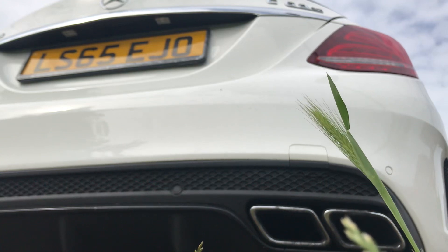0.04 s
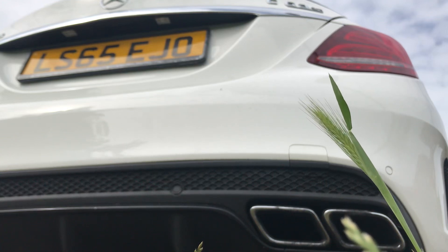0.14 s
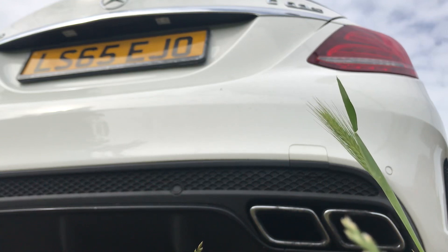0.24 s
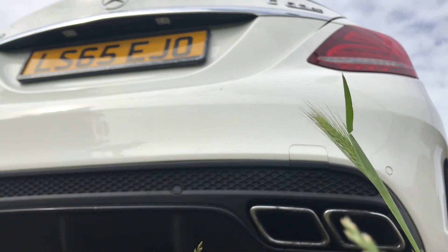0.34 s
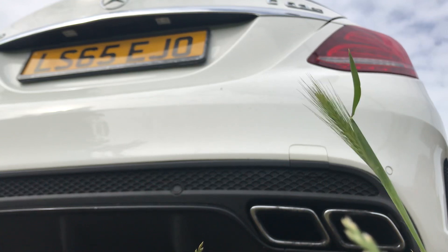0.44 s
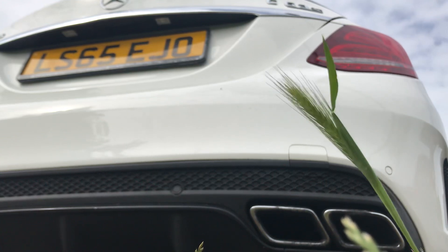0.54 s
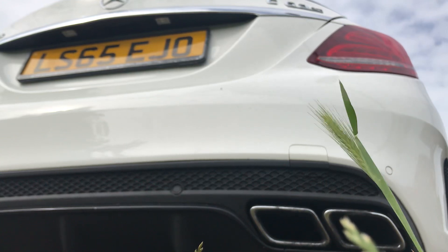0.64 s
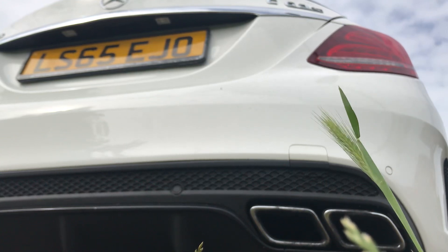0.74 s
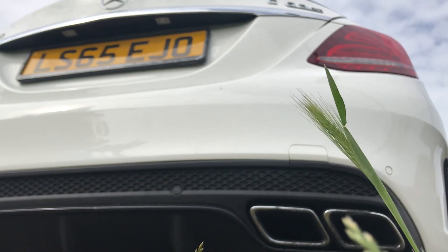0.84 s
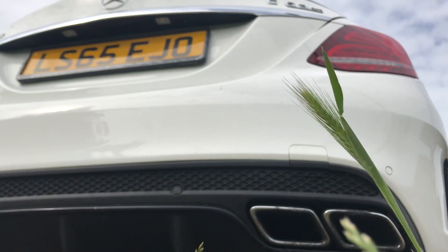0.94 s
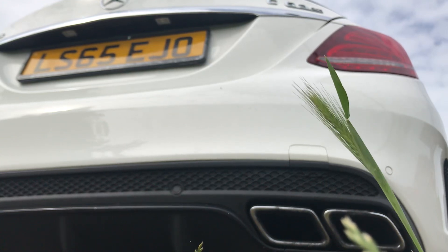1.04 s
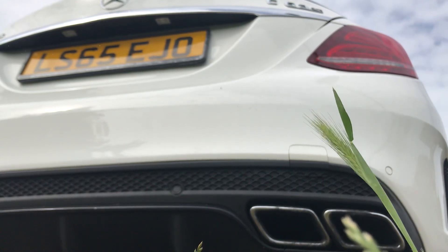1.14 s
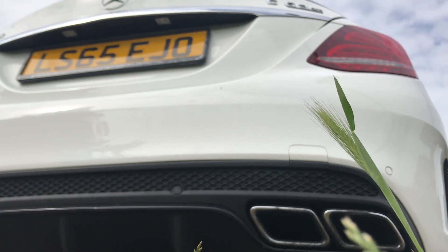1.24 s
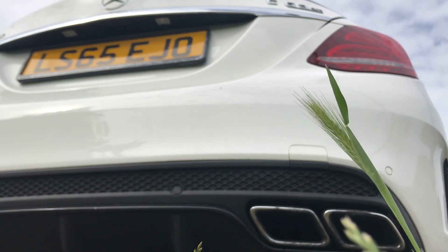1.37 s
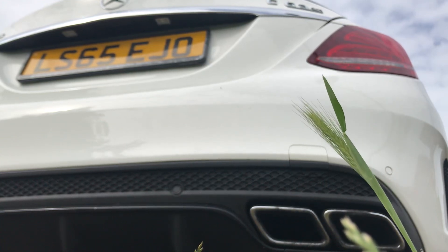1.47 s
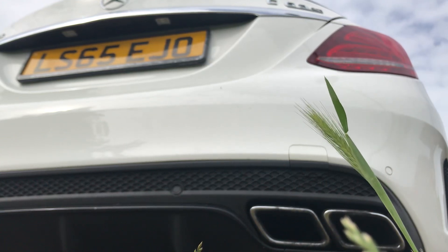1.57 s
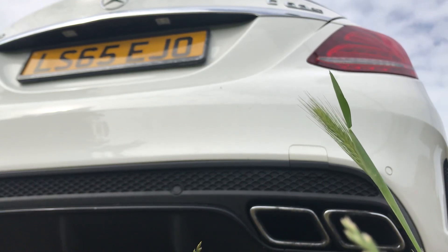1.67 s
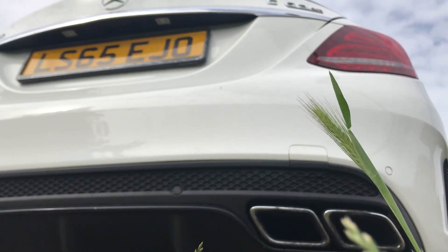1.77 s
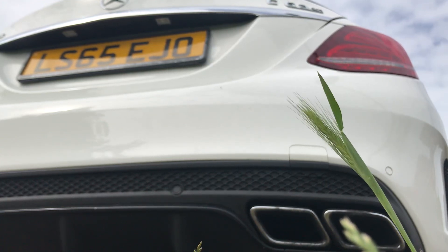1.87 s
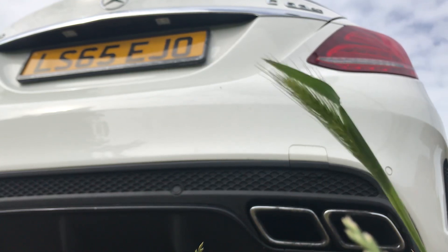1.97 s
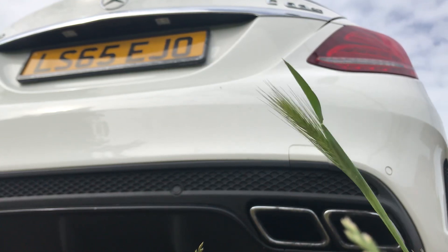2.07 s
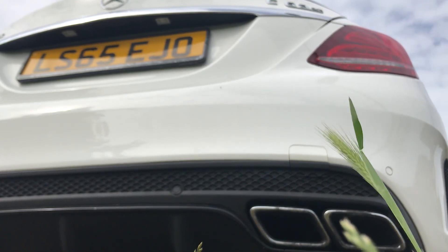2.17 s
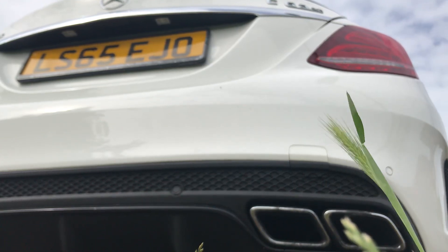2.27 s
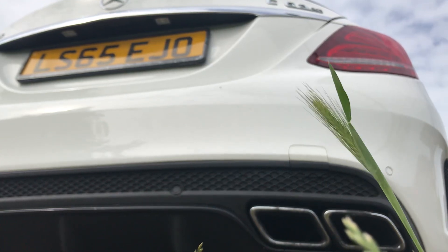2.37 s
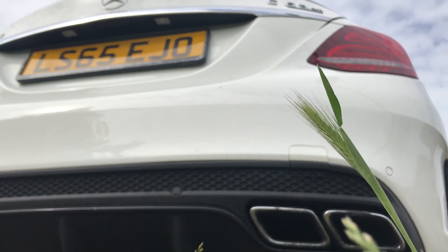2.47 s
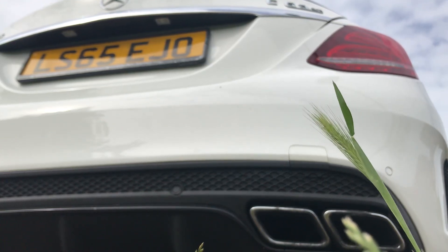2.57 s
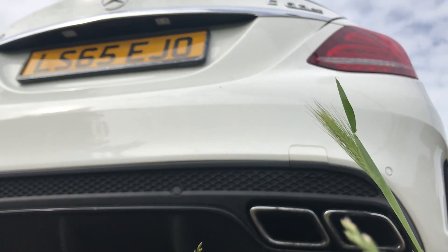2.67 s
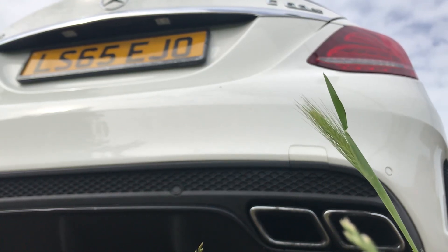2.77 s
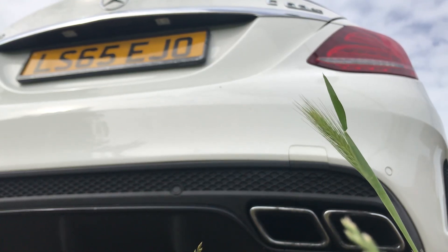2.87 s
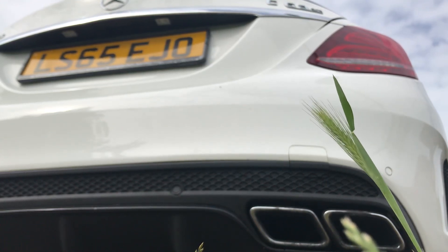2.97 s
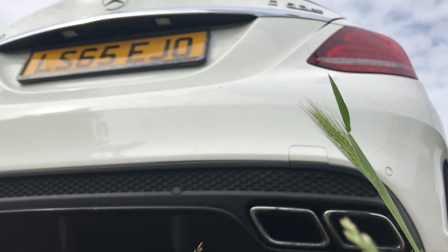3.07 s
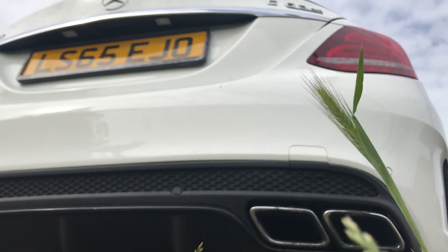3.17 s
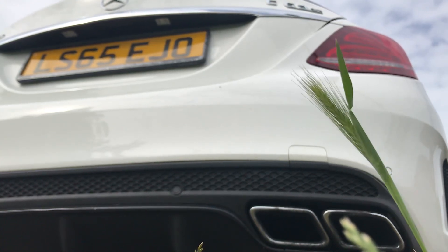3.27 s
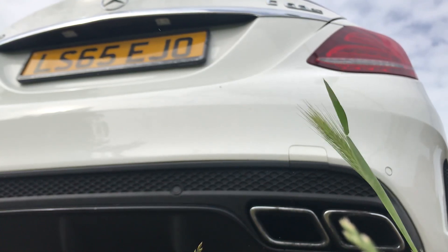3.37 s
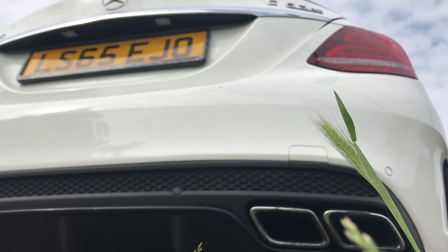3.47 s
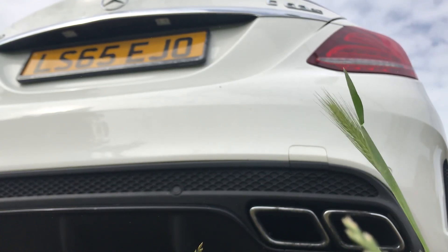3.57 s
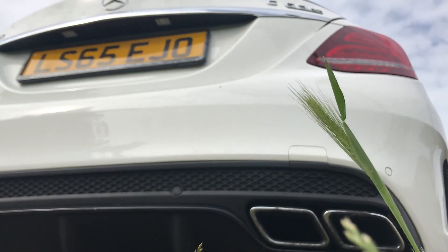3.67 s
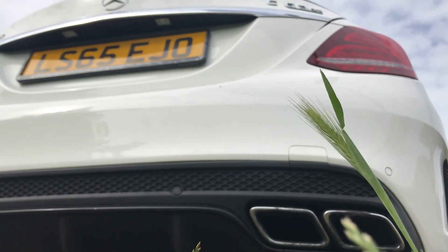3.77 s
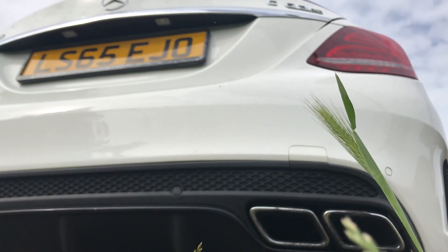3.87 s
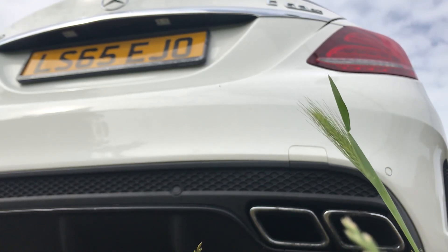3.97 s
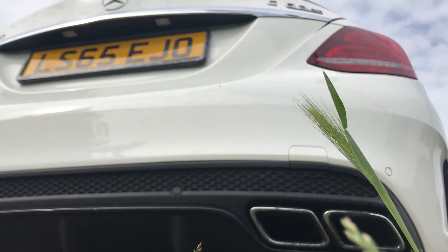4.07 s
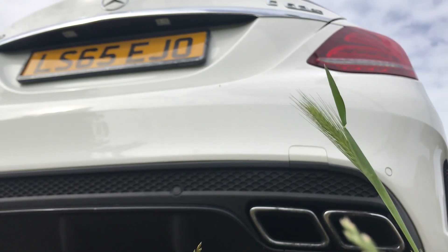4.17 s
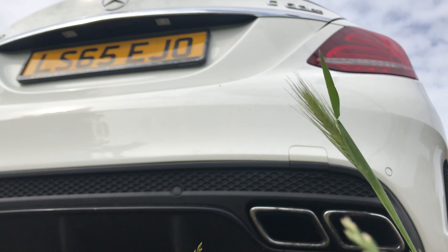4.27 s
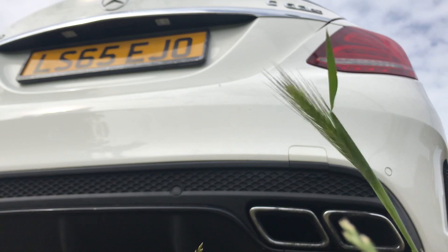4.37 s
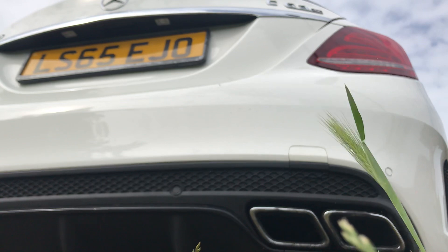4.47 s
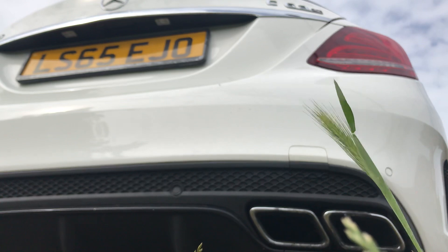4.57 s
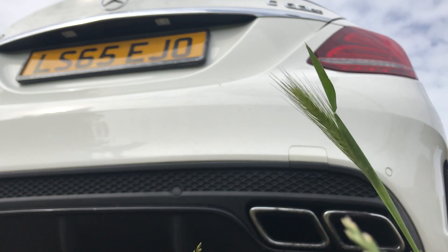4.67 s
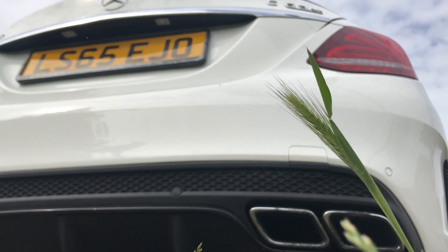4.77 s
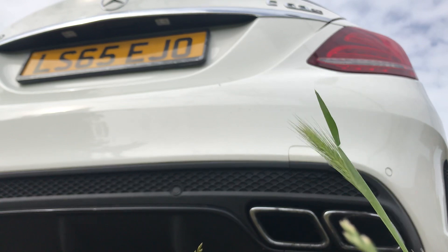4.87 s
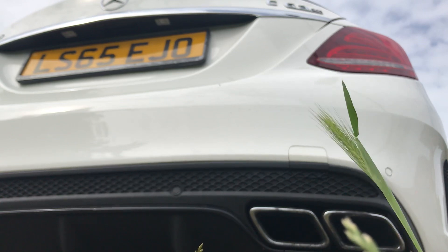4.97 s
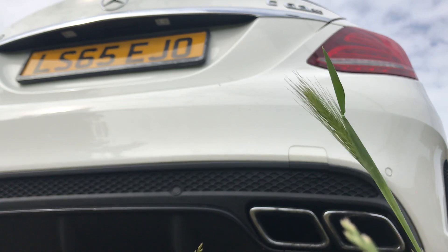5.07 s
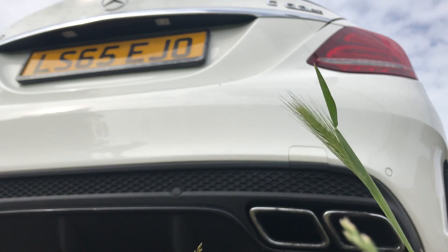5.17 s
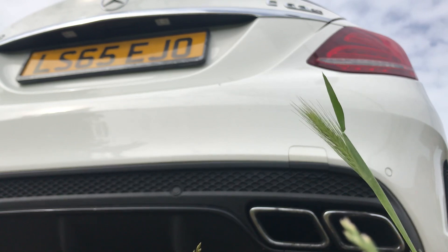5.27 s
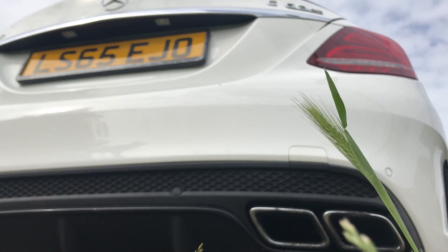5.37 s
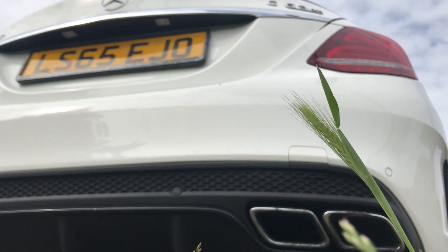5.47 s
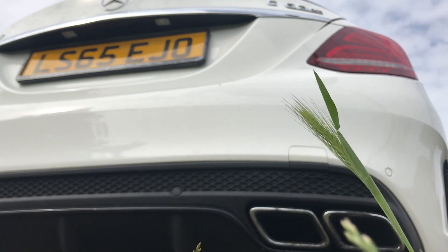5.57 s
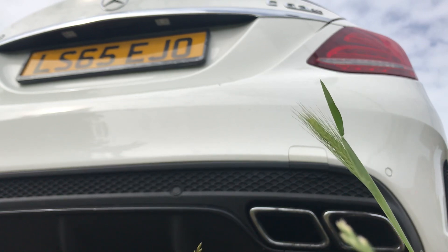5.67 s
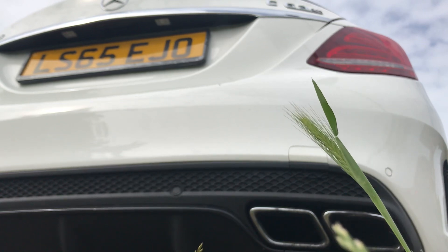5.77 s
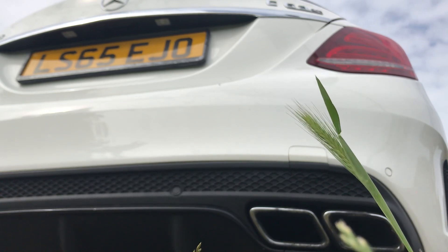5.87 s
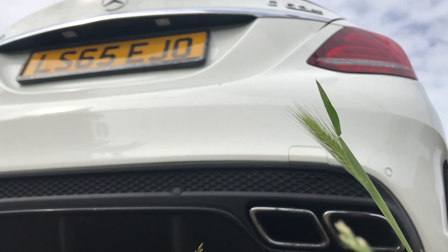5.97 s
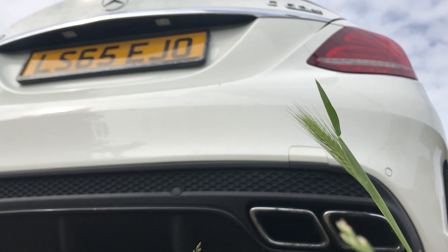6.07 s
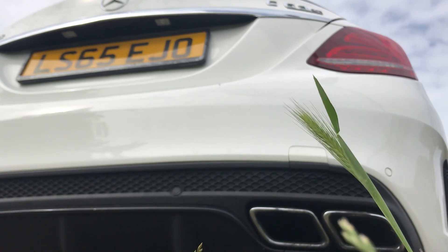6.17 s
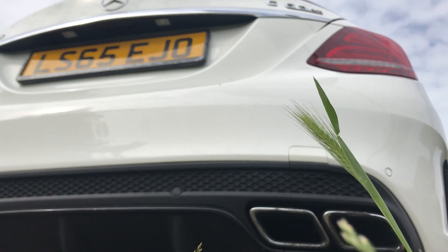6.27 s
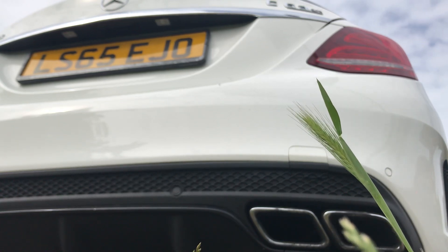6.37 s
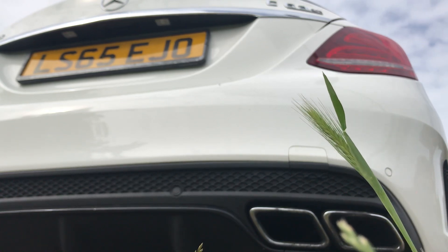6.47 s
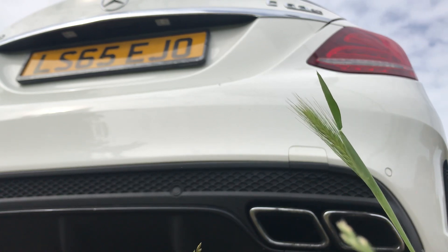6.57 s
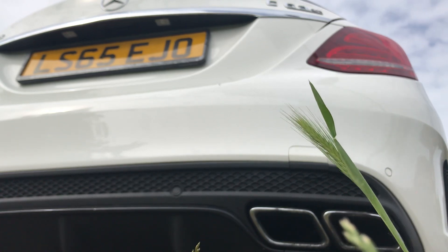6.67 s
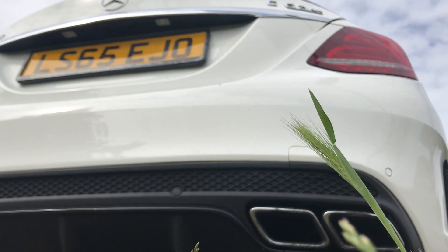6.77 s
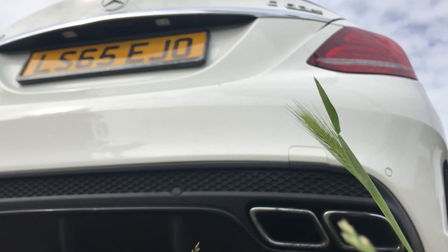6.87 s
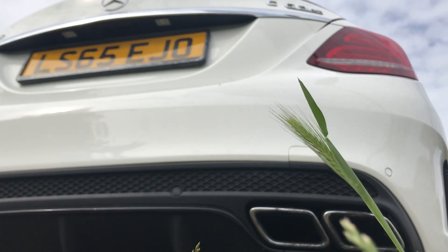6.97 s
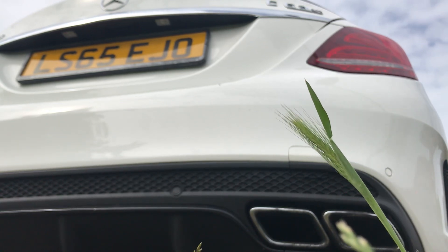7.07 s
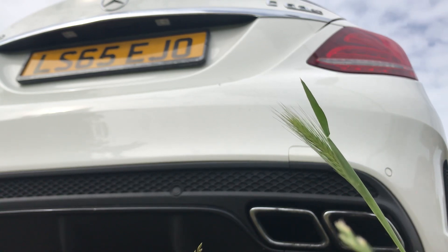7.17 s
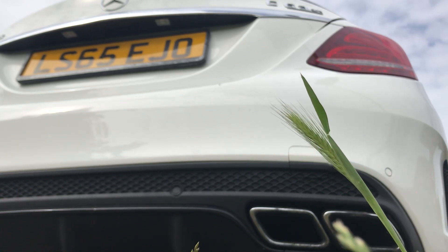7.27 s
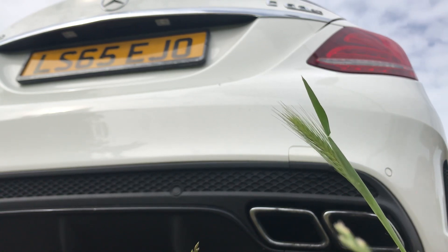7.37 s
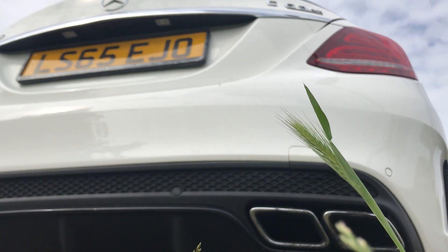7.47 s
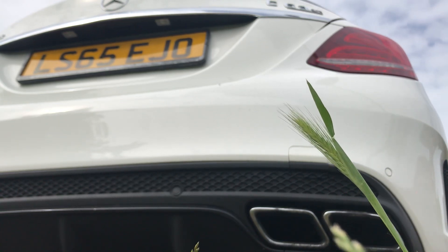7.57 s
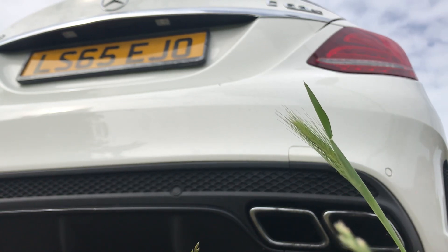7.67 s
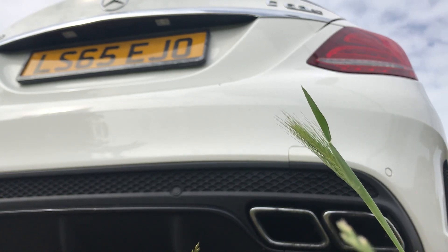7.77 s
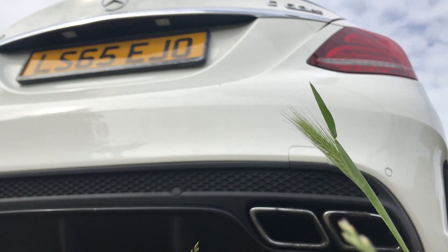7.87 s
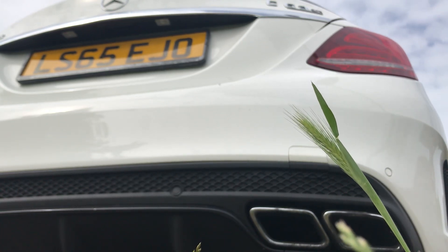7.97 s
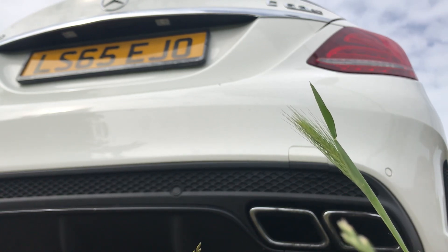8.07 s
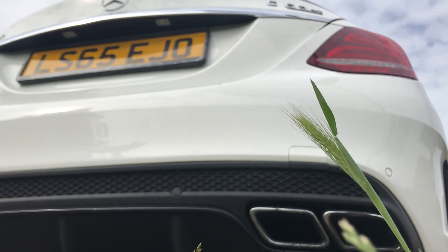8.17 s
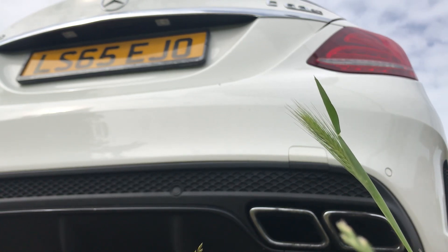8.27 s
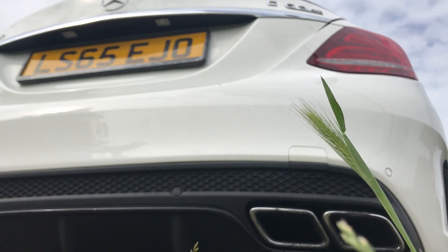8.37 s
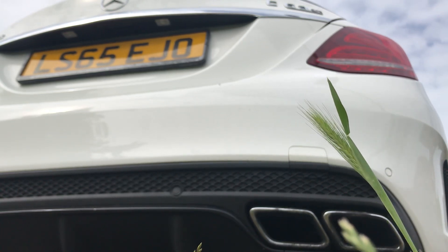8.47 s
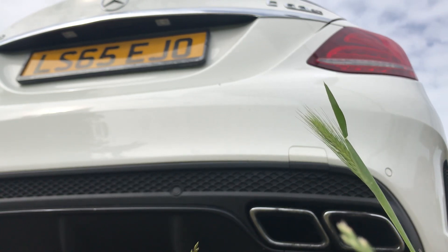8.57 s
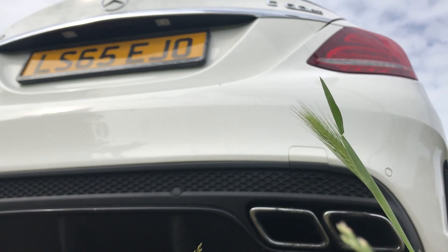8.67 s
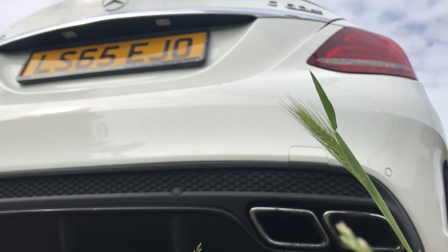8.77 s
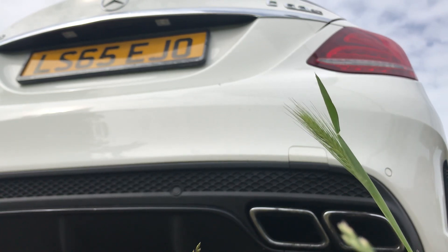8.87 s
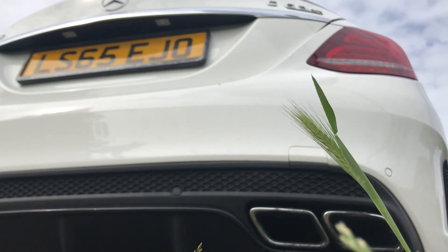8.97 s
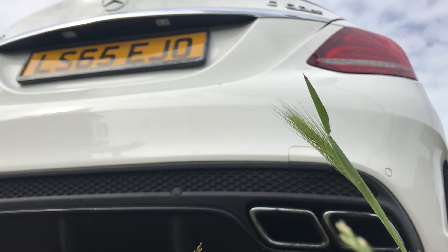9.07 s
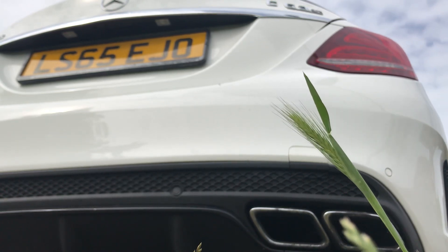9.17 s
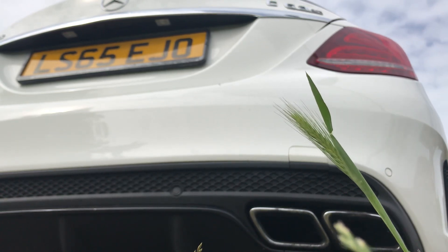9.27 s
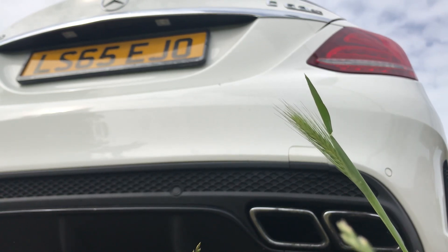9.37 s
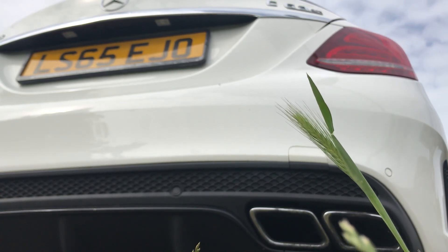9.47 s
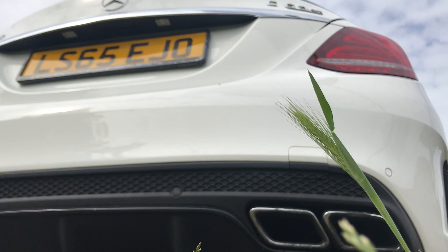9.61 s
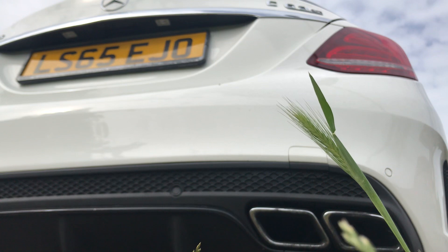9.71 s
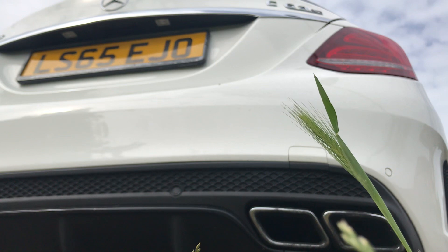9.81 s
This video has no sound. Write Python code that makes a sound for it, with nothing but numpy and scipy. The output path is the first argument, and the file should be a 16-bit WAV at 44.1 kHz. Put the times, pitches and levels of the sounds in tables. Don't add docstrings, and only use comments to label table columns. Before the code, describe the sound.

A deep, uneven eight-cylinder exhaust note sits right in front of a phone in the grass. It jumps up in four short sharp revs, loud enough to round off at the peaks, with crackles and gunshot-like pops as revs drop and thin metallic squeals from an exhaust flap. After a calm idle, the engine dies abruptly; a tiny falling whine, sparrows, low hum and wind puffs remain.

```python
import sys
import numpy as np
from scipy import signal
from scipy.fft import rfft, irfft, next_fast_len
from scipy.io import wavfile
from scipy.ndimage import uniform_filter1d

SR = 44100
rng = np.random.default_rng(int(sys.argv[2]) if len(sys.argv) > 2 else 0)


def materialize(psi):
    bounded = np.clip(np.atleast_2d(psi).T, -1, 1)
    quanta = np.round(bounded * 32767).astype(np.int16)
    wavfile.write(sys.argv[1], SR, quanta)


def volts_from_decibels(level):
    exponent = np.asarray(level, float) / 20
    return 10 ** exponent


N = 433931
T = np.arange(N) / SR
LONG = next_fast_len(N, True)
F = np.fft.rfftfreq(LONG, 1 / SR) + 1e-3

# pitch in Hz, width in Hz, level in dB.
PIPE = [(58.4, 13.2, 2), (128.7, 70, -8.5), (163.5, 13.8, -6), (190.8, 11.4, -19.5), (304, 14.5, -20.5),
        (328, 38, -26)]
# pitch in Hz, width in Hz, level in dB.
RASP = [(540, 85, -0.5), (705, 40.4, -2.5), (801, 29, 1), (942, 105, -4), (1037, 29.4, 1),
        (1179.4, 38, 0.5), (1320, 110, -3.5), (1576, 270, -7.5), (2064, 19.4, -10), (2300, 170, -26),
        (2727, 62, -17.5)]
# pitch in Hz, width in Hz, level in dB.
SNAP = [(1022, 260, 6), (2210, 180, -11.5)]
# frequency in Hz, level in dB per Hz.
HISS = [(1470, 9.5), (2500, 2), (2750, -3.5), (3240, 0), (4060, -5.5), (4780, -5), (6330, -1), (7580, -9),
        (15100, -13), (16200, -42.5)]
# opens in seconds, top speed in seconds, top firing rate in Hz,
# fuel returns in seconds, strength in dB.
BLIPS = [
    (.32, 0.532, 140.9, 1.15, -3.5),
    (1.839, 2.057, 134.5, 2.77, -4),
    (3.05, 3.236, 146.8, 3.94, -3.5),
    (4.175, 4.361, 160.2, 5.2, -5),
]
COAST_S = 0.65


def shape(x, gain):
    return irfft(rfft(x, LONG) * gain, LONG)[:N]


def unit(x, span_s=None):
    power = uniform_filter1d(x ** 2, int(span_s * SR)) if span_s else np.mean(x ** 2)
    return x / np.sqrt(np.abs(power) + 1e-12)


def modes(x, table):
    gain = 0
    for k, (hz, width, db) in enumerate(table):
        gain = gain + (-1) ** k * volts_from_decibels(db) * 1j * F * width / (hz ** 2 - F ** 2 + 1j * F * width)
    return shape(x, gain)


def colour(x, table):
    hz, db = np.transpose(table)
    return shape(x, volts_from_decibels(np.interp(np.log(F), np.log(hz), db, left=-90, right=-90)))


def high_pass(x, hz, order):
    return shape(x, (1j * F / (hz + 1j * F)) ** order)


def muffle(x):
    return signal.sosfilt(signal.butter(2, 2300, fs=SR, output="sos"), x)


def clicks(times, sizes):
    place = np.clip(np.asarray(times) * SR, 0, N - 2)
    i = place.astype(int)
    return np.bincount(i, sizes * (1 + i - place), N) + np.bincount(i + 1, sizes * (place - i), N)


def fade(x, tau_s):
    return signal.lfilter([1], [1, -np.exp(-1 / (tau_s * SR))], x)


def tone(hz):
    return np.sin(2 * np.pi * np.cumsum(hz) / SR)


def played(table):
    s, *columns = np.transpose(table)
    gate = np.clip(np.minimum(T - s[0], s[-1] - T) / 0.0062, 0, 1)
    return gate, [np.interp(T, s, c) for c in columns]


def speed():
    # time in seconds, firing rate in Hz.
    idle_curve = [(0, 63.7), (.3, 61.4), (1.2, 78), (1.38, 76.5), (1.8, 62.6), (2.66, 76), (3.03, 68),
                  (3.9, 67.4), (4.15, 74), (5.01, 71.3), (5.35, 61.5), (5.55, 59), (5.79, 65.9),
                  (6.25, 60.9), (8.16, 60.1), (8.46, 56), (8.7, 51.9)]
    idle = played(idle_curve)[1][0]
    hz = idle.copy()
    for opens, top, top_hz, _, _ in BLIPS:
        climb = np.sin(np.pi / 2 * np.clip((T - opens) / (top - opens), 0, 1))
        start, end = np.interp([opens, top + COAST_S], T, idle)
        coast = np.clip((T - top) / COAST_S, 0, 1)
        inside = (T > opens) & (T < top + COAST_S)
        hz[inside] = (start + (top_hz - start) * climb - (top_hz - end) * coast)[inside]
    return hz, idle


def effort(idle_hz):
    # whole boom in dB, drone in dB, gas rasp in dB, gas hiss in dB.
    idling = (-16, -17, -43, -55)
    gulping = (-18, -19.5, -37, -44.5)
    pulling = (-1, -10, -13, -31)
    lifting = (-2.5, -7, -15, -35)
    fuel_cut = (-15, -15.5, -30.5, -42.5)
    coasting = (-21, -31.5, -37.5, -53)
    catching = (-23, -31, -44, -48)
    state_scatter_db = (.8, 1.5, 1.5, 3, 7, 6, 1.5)
    # centre in seconds, length in seconds, level in dB.
    swells = [(0.605, 0.11, -5), (0.794, 0.25, -10), (1.06, 0.033, -12.5), (2.254, 0.42, -14),
              (2.483, 0.26, -18), (3.058, 0.023, -2.5), (3.431, 0.23, -8), (3.665, 0.17, -18),
              (4.446, .16, -8.5), (4.616, .2, -13.5), (4.815, 0.2, -14), (5.313, 0.077, -17.5),
              (5.45, 0.085, -22), (5.679, 0.26, -17.5), (8.283, 0.067, -13.5), (8.366, 0.04, -20)]
    gulp_s, attack_s, cut_s, fade_s, catch_s, settle_s = 0.02, 0.069, 0.08, 0.34, 0.14, 0.45
    hiss_ends_s = 0.24
    heat_db = 1.5
    boom_leads_s = 0.021
    key_off_s, last_firing_s = 8.22, 8.42
    boom_dies_db_s, gas_dies_db_s = 136, 195

    states = np.c_[[idling, gulping, pulling, lifting, fuel_cut, coasting, catching], state_scatter_db]
    rows = []
    for k, (opens, top, _, fuel, db) in enumerate(BLIPS):
        lift = np.array([db, db, db, db, 0])
        heat = np.array([0, 0, 0, heat_db * k, 0])
        faded = top + fade_s
        hiss_end = max(faded, fuel - hiss_ends_s)
        rows += [(opens - gulp_s - 0.1, *states[0]),
                 (opens - gulp_s, *states[1]),
                 (opens + attack_s, *states[2] + lift),
                 (top, *states[3] + lift),
                 (top + cut_s, *states[4] + heat),
                 (faded, *states[5] + heat),
                 (hiss_end, *states[5] + heat),
                 (hiss_end + 0.013, *states[5]),
                 (fuel - catch_s, *states[5]),
                 (fuel, *states[6]),
                 (fuel + settle_s, *states[0])]
    rows = np.array(rows)
    rows = rows[rows[:, 0] <= np.minimum.accumulate(rows[::-1, 0])[::-1]]
    boom, drone, rasp, hiss, scatter = played(rows)[1]
    boom, drone = (np.interp(T + boom_leads_s, T, db) for db in (boom, drone))
    swell = sum(volts_from_decibels(db) * np.cos(np.pi * np.clip((T - s) / length, -0.5, 0.5)) for s, length, db in swells)
    louder = lambda db, extra: 20 * np.log10(np.hypot(volts_from_decibels(db), extra))
    fast = 0.1721 * (idle_hz - 60)
    dead = np.maximum(T - last_firing_s, 0)
    boom = louder(boom, swell) - boom_dies_db_s * dead
    drone = drone - boom_dies_db_s * np.maximum(dead - 0.04, 0)
    rasp = louder(rasp + fast, volts_from_decibels(-22) * swell) - gas_dies_db_s * dead
    hiss = hiss + fast / 2 - 2 * gas_dies_db_s * dead
    scatter = scatter + 3 * np.clip((T - key_off_s) / 0.08, 0, 1)
    return boom, drone, rasp, hiss, scatter


def engine():
    # size in dB, lag in firing gaps.
    cylinders = [(-0.3, 0.089), (-0.5, -0.102), (0.7, -0.174), (-4.3, 0.133), (-1.2, 0.151), (0.2, -0.077),
                 (2.1, -0.177), (1.0, 0.174)]
    crack_db = [-4, -10, -10, -3, -10, -10, 0, -10]
    # pitch in Hz, width in Hz, level in dB.
    trims = [(3050, 73, 2.5), (4250, 48, 20), (5620, 120, 6), (5900, 110, 19.5), (6400, 490, -20)]
    # multiple of the firing rate, level in dB.
    overtones = [(1.5, -9), (2, -18)]
    hz, idle_hz = speed()
    boom_db, drone_db, rasp_db, hiss_db, misfire_db = effort(idle_hz)
    load = np.clip((rasp_db + 38) / 16, 0, 1)

    drone = volts_from_decibels(drone_db - 2.5 * np.maximum(misfire_db - 4, 0))
    drone = np.maximum(drone, 0.8 * volts_from_decibels(boom_db) * load * np.clip(4 - misfire_db, 0, 1))
    phase = np.cumsum(hz) / SR
    note = np.sin(2 * np.pi * phase + 1.39)
    note = note + load * sum(volts_from_decibels(db) * np.sin(2 * np.pi * k * phase) for k, db in overtones)

    n = np.arange(int(phase[-1]) - 1)
    size_db, lag = np.array(cylinders)[n % 8].T
    chance = rng.standard_normal((N // 200, 3))[n].T.clip(-2.5, 1.5)
    scatter_db, throttle = np.interp(n, phase, misfire_db), np.interp(n, phase, load)
    lag = lag * (np.interp(n, phase, hz) / 60) ** 0.35
    times = np.interp(n + lag + 0.0225 * scatter_db * chance[0], phase, T)
    firings = fade(clicks(times, volts_from_decibels(size_db + scatter_db * chance[1])), 0.00025)
    booms = high_pass(modes(firings, PIPE), 27.2, order=4)
    whole = volts_from_decibels(boom_db) ** 2
    rest = np.sqrt(np.maximum(whole - drone ** 2, 0.037 * whole))
    low = np.sqrt(2) * drone * note + rest * unit(booms, span_s=0.3)

    front_db = (1 - 0.75 * throttle) * np.array(crack_db)[n % 8] + (1.2 + 1.3 * throttle) * chance[2]
    fronts = clicks(times, volts_from_decibels(front_db))
    puffs = load * fade(fronts, 0.003) + (1 - load) * 0.011 * fade(fade(fronts, 0.002), 0.004)
    puffs = puffs + 0.22 - 0.14 * load
    rasp = modes(puffs * rng.standard_normal(N) + (0.5 + 1.43 * load) * fronts, RASP)
    rasp = high_pass(rasp, 130, order=2)
    knock = unit(modes(fronts, [(464, 72, 0.24), (700, 124, -1.2)]), span_s=0.16)
    snap = unit(high_pass(muffle(modes(fronts, SNAP)), 500, order=1), span_s=0.1)
    rasp = unit(rasp, span_s=0.1) + 1.05 * (1 - load) * knock + 0.7 * load * snap

    jet = (puffs + 0.25) * rng.standard_normal(N)
    hiss = unit(colour(jet, HISS)) + 0.35 * unit(modes(jet, trims))
    hiss = hiss + (-0.3 + 5.4 * load) * high_pass(hiss, 4700, order=1)
    return low + volts_from_decibels(rasp_db) * rasp + volts_from_decibels(hiss_db) * unit(hiss, span_s=0.1), phase


def pops():
    # start in seconds, peak in dB, treble against the peak in dB, cavity pitch in Hz.
    hard_pops = [(0.497, -6, -50, 1070), (0.569, -14.5, -11, 1020), (0.629, -13, -41, 1040),
                 (0.74, -13.5, -51, 840), (0.794, -16.5, -11, 931), (0.829, -6.5, -2.5, 830),
                 (2.018, -8.5, -51.5, 1130), (2.089, -29.5, -38, 778), (2.136, -33, -52, 1030),
                 (2.243, -13.5, -30, 610), (3.211, -13, -47, 1060), (3.264, -9.5, -43, 844),
                 (3.294, -6, -15.5, 1001), (3.319, -16, -49, 1063), (3.365, -18, -15, 825),
                 (3.429, -11, -11, 880), (3.497, -5.5, -56.5, 1030), (3.54, -11.5, -49.5, 1070),
                 (4.207, -11, -27, 1176), (4.367, -4.5, -55, 1090), (4.398, -11.5, -10, 1000),
                 (4.447, -8, -10.5, 993), (4.565, -3, -28, 1030), (4.618, -7.5, -22, 1020),
                 (4.644, -10.5, -41, 790), (4.684, -10, -46, 546), (4.786, -9.5, -62, 645),
                 (4.807, -12, -45, 545), (1.047, -21, -33, 610), (8.511, -36.5, -37, 580)]
    # start in seconds, peak in dB, cavity pitch in Hz.
    burbles = [(.32, -16.5, 830), (1.841, -13.5, 1220), (2.303, -19, 810), (2.398, -30, 940),
               (2.447, -18, 443), (2.544, -28, 540), (2.596, -29, 655), (3.054, -13, 976),
               (3.623, -25, 533), (3.647, -27, 447), (3.672, -13, 537), (3.747, -27, 700),
               (3.906, -24.5, 1170), (4.183, -30, 450), (4.608, -18, 829), (4.82, -12, 820),
               (4.954, -24, 940), (5.012, -25.5, 566.3), (5.044, -23.5, 1035), (5.289, -25, 1178),
               (5.324, -23, 1163), (5.412, -20.5, 1215), (5.455, -22, 1140), (5.546, -22, 1147),
               (5.659, -36, 769.5), (8.162, -34, 771), (8.215, -26, 573), (8.262, -32, 570.4),
               (8.315, -27.5, 460), (8.381, -27, 477)]
    pop_ring, burble_ring = (0.7, 0.004, 1.2), (1.1, 0.008, 0.25)
    burble_treble_db = -29
    events = hard_pops + [(s, db, burble_treble_db, hz) for s, db, hz in burbles]
    s, db, treble_db, ring_hz = np.transpose(events)
    ring, ring_s, sharp = np.repeat([pop_ring, burble_ring], [len(hard_pops), len(burbles)], axis=0).T

    front = clicks(s, sharp * volts_from_decibels(db))
    kick = clicks(s, volts_from_decibels(db))
    burst = fade(kick, 0.0035) + 0.09 * fade(kick, 0.018)
    peak = lambda table: np.abs(modes(clicks([1], np.ones(1)), table)).max()
    crack = modes(burst * rng.standard_normal(N) * 0.1 + front, RASP) / peak(RASP)
    crack = crack + 0.7 * modes(front, SNAP) / peak(SNAP)
    t = T[:1500]
    for start, size, tau, hz in zip(s, ring * volts_from_decibels(db), ring_s, ring_hz):
        swell_in = np.minimum(t * 4 / tau, 1) ** (tau > 0.005)
        crack[int(start * SR):][:1500] += size * np.exp(-t / tau) * swell_in * np.sin(2 * np.pi * hz * t)

    gas = unit(colour(rng.standard_normal(N), HISS))
    gas = gas - 0.7 * high_pass(gas, 7000, order=1)
    dull_gas = gas - high_pass(gas, 5000, order=1)
    fizz = fade(clicks(s, volts_from_decibels(db + treble_db - 2)), 0.005) * gas
    fizz = fizz + 0.4 * fade(clicks(s, volts_from_decibels(db + treble_db)), 0.017) * dull_gas
    thump = modes(fade(clicks(s, volts_from_decibels(db - 24.5)), 0.00067), PIPE)
    thump = high_pass(thump, 41.5, order=4) / peak(PIPE)
    return volts_from_decibels(1.5) * high_pass(muffle(crack), 300, order=2) + fizz + thump


def flap(phase):
    # start in seconds, length in seconds, start pitch in Hz, end pitch in Hz, level in dB.
    squeaks = [
        (0.609, 0.17, 12000, 10900, -34),
        (2.14, 0.17, 11650, 11050, -34),
        (3.3, 0.15, 11370, 11350, -33),
        (4.385, .14, 11360, 11380, -38.5),
        (8.267, 0.17, 11420, 11100, -26.5),
    ]
    peak_share, start_db, end_db = 0.51, -11.5, -36.5
    waver = unit(uniform_filter1d(rng.standard_normal(N), size=150))
    chop = unit(0.21 + np.cos(np.pi * phase) ** 2)
    out = 0
    for s, length, hz0, hz1, db in squeaks:
        curve = [(s, db + start_db), (s + peak_share * length, db), (s + length, db + end_db)]
        gate, (level_db,) = played(curve)
        hz = np.interp(T, [s, s + length], [hz0, hz1]) + 70 * waver
        out = out + gate * volts_from_decibels(level_db) * np.sqrt(2) * chop * tone(hz)
    return out


def pump():
    # time in seconds, pitch in Hz, level in dB.
    run_down = [(8.52, 2000, -72), (8.58, 1890, -64), (8.68, 1710, -57)]
    gate, (hz, db) = played(run_down)
    return gate * volts_from_decibels(db) * np.sqrt(2) * tone(hz)


def whines():
    # start in seconds, end in seconds, start pitch in Hz, end pitch in Hz, level in dB.
    glides = [(5.6, 6.9, 9900, 10100, -73), (6.9, 8.2, 10100, 8500, -70), (7.55, 7.95, 2540, 2460, -57),
              (7, 8.2, 9400, 8200, -73), (6.76, 6.79, 3400, 3350, -56), (9.1, 9.8, 14600, 8200, -79),
              (9.02, 9.5, 9900, 8200, -78), (0, 5.36, 5650, 5600, -62), (0, 5.36, 4420, 4400, -65)]
    out = 0
    for t0, t1, hz0, hz1, db in glides:
        gate, (hz,) = played([(t0, hz0), (t1, hz1)])
        tremble = unit(uniform_filter1d(rng.standard_normal(N), size=200))
        out = out + gate * volts_from_decibels(db) * tone(hz * (1 + 0.023 * tremble))
    return out


def sparrows():
    # delay in seconds, length in seconds, start pitch in Hz, end pitch in Hz, level in dB.
    strokes = [(-.004, .017, 3900, 6400, -2), (.013, .05, 6500, 4300, 0), (.02, .045, 5900, 4500, -3),
               (.066, .012, 4600, 5900, -5), (.078, .024, 5900, 6050, -8), (.095, .011, 5900, 4200, -6),
               (.113, .022, 3640, 4700, -2), (.142, .032, 3660, 4400, -1)]
    # start in seconds, stretch as a factor, level in dB.
    calls = [(7.052, 1, -59), (7.487, 1, -62), (8.767, 0.6, -55), (9.111, 0.96, -51.5), (9.624, 0.98, -59)]
    arch = 0.76
    out = np.zeros(N)
    for s, stretch, call_db in calls:
        for after, length, hz0, hz2, db in strokes:
            u = np.linspace(0, 1, int(length * stretch * SR))
            hz1 = min(hz0, hz2) + arch * abs(hz2 - hz0)
            hz = hz0 * (1 - u) * (1 - 2 * u) + 4 * hz1 * u * (1 - u) + hz2 * u * (2 * u - 1)
            stroke = volts_from_decibels(call_db + db) * np.sqrt(np.abs(np.sin(np.pi * u))) * tone(hz)
            out[int((s + after * stretch) * SR):][:len(u)] += stroke
    echo = rng.standard_normal(4000) * np.exp(-T[:4000] / 0.03)
    return out + volts_from_decibels(-34) * signal.fftconvolve(out, echo)[:N]


def outdoors():
    # frequency in Hz, level in dB per Hz.
    hum_colour = [(120, -46.5), (200, -8), (354, -4.5), (388, -7.5), (492, -16), (737, -14), (2670, -28),
                  (2870, -25), (6570, -38.5), (8340, -41), (10200, -46), (13500, -39), (16200, -48)]
    # peak in seconds, level in dB, stretch as a factor.
    wind_puffs = [
        (8.88, -49, 5.6),
        (9.33, -45, 1),
        (9.548, -22.5, 0.69),
        (9.62, -50, 1.5),
        (9.765, -31.5, 1.04),
    ]
    hum_db, breeze_db = -52, -46
    rise_s, fall_s = 0.016, 0.022
    wind = volts_from_decibels(breeze_db)
    for s, db, stretch in wind_puffs:
        wind = wind + volts_from_decibels(db) * np.exp(-np.abs(T - s) / np.where(T < s, rise_s, fall_s) / stretch)
    rumble = modes(rng.standard_normal(N), [(48, 40.3, -3), (91.3, 50.4, -1), (194, 56.4, -11.5)])
    rumble = high_pass(rumble, 15, order=3)
    hum = unit(colour(rng.standard_normal(N), hum_colour))
    return volts_from_decibels(hum_db) * hum + wind * unit(rumble, span_s=0.03)


def scene():
    motor, phase = engine()
    return (motor + pops() + flap(phase) + pump() + whines() + sparrows() + outdoors())[None]


def low_pass(x):
    return signal.sosfilt(signal.butter(12, 16320, fs=SR, output="sos"), x)


def record(dry):
    rounded = np.tanh(dry ** 2 * 0.82) ** 0.5 * np.sign(dry)
    return low_pass(rounded)


dry = scene()
out = record(dry)
materialize(out)
```